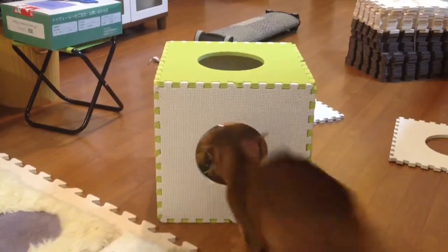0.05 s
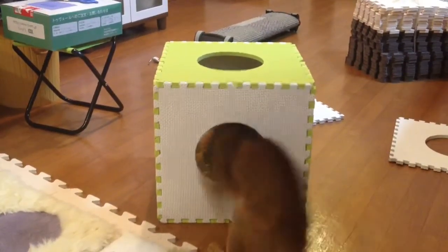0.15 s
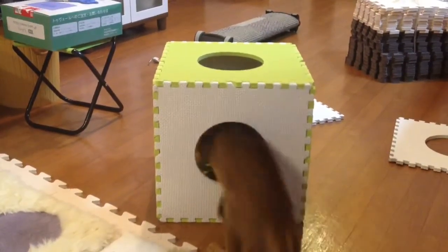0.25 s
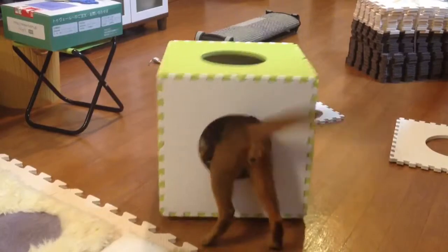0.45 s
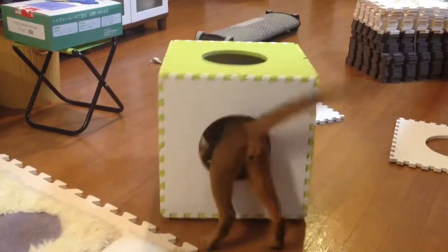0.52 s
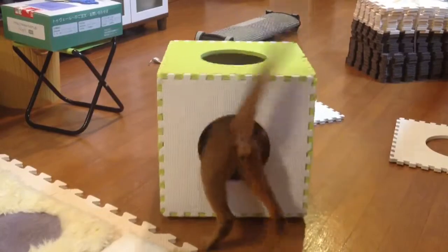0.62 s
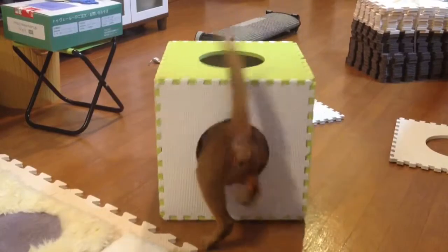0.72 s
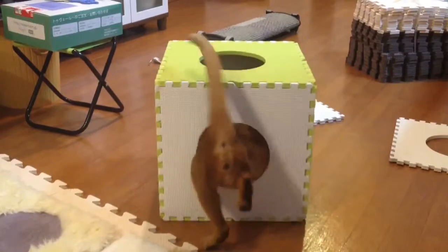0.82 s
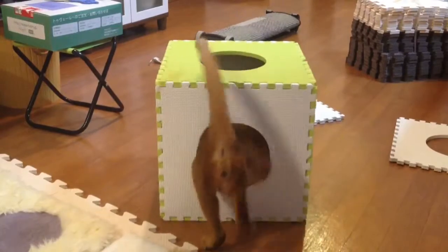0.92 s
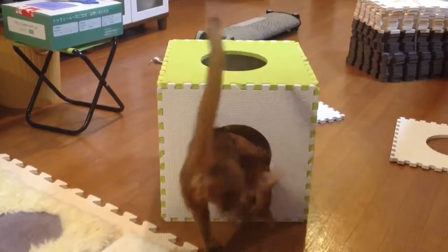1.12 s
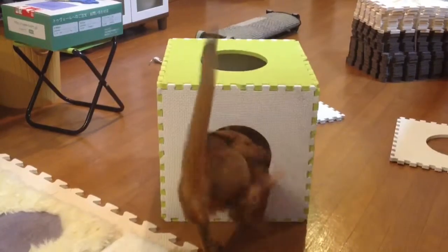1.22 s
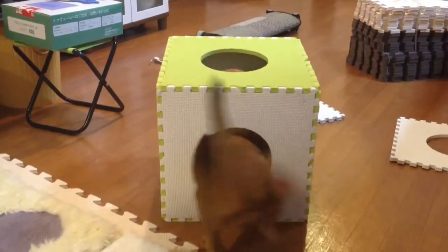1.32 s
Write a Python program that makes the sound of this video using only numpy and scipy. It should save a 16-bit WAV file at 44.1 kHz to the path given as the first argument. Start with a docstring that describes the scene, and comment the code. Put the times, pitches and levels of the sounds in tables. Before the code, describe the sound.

Dull, hollow thumps come in a quick cluster as a scuffling cat dives into a foam cube. Fur brushes and claws tick on the hard floor, then one sharp clack and lighter bumps follow, in a quiet room.

```python
"""Two young cats scuffle at a hollow cube of foam mats on a hard living room floor.
First fur brushes the foam with a soft hiss. Then one cat dives in through the hole: paws and
body thump the cube and make it ring, while claws tick and skid on the floor. At about 0.8 s
a hind foot comes down with one sharp clack. Lighter bumps and rubs end the scuffle.
A short echo and the faint hush of the room lie behind it all."""
import sys
import numpy as np
from scipy import signal
from scipy.fft import rfft, irfft
from scipy.io import wavfile

SR = 44100
rng = np.random.default_rng(int(sys.argv[2]) if len(sys.argv) > 2 else 0)


def transcribe(u):
    """Save the signal u as a 16-bit wav file named by the first command-line argument.

    u: samples, shape (n,) or (channels, n), limited to [-1, 1]; the rate is SR.
    q: integer samples, one column per channel.
    """
    v = np.clip(np.atleast_2d(u).T, -1, 1)
    q = np.round(v * 32767).astype(np.int16)
    wavfile.write(sys.argv[1], SR, q)


N = 59535
TIME = np.arange(N) / SR


def from_db(db):
    """Turn decibels into a number to multiply a sound by."""
    return 10 ** (np.asarray(db) / 20)


def rms_one(x):
    """Scale a sound so that its average strength (rms) is 1."""
    return x / np.sqrt(np.mean(x ** 2) + 1e-20)


def at_hz(points, hz):
    """Read between the rows of a table, with every octave equally wide."""
    pitches, values = np.transpose(points)
    return np.interp(np.log(np.maximum(hz, 1)), np.log(pitches), values)


def filtered(x, hz, kind, order=2):
    """Keep the lows, the highs or a band of a sound, or take a band out."""
    sections = signal.butter(order, np.clip(hz, 10, .45 * SR), kind, fs=SR, output="sos")
    return signal.sosfilt(sections, x + 1e-18)


def coloured(spectrum):
    """Noise of strength 1 whose lows and highs follow a table."""
    gains = from_db(at_hz(spectrum, np.fft.rfftfreq(N, 1 / SR)))
    return rms_one(irfft(rfft(rng.standard_normal(N)) * gains, N))


def click(start_s):
    """The shortest possible tap."""
    return np.maximum(0, 1 - np.abs(TIME - start_s) * SR)


def ring(force, tones):
    """A struck thing rings with several tones; each falls by 60 dB in its fade_s."""
    out = 0
    for pitch_hz, level_db, fade_s in tones:
        decay = from_db(-60 / (fade_s * SR))
        turn = decay * np.cos(2 * np.pi * pitch_hz / SR)
        tone = signal.lfilter([1, -turn], [1, -2 * turn, decay * decay], force + 1e-18)
        out = out + from_db(level_db) * tone
    return out


def thumps(thud_db=1, thud_cycles=15.9, crunch_db=-17, crunch_fade_s=0.041, foam_top_hz=1083):
    """Each blow is a smooth push that thuds, rings the cube and crushes the foam a little."""
    # soft blows of paws and bodies: time_s, level_db, brightness_hz, pitch_hz
    blows = [(0.155, -33.5, 240, 257), (0.1632, -36.5, 330, 292), (0.1705, -30.5, 625, 211),
             (0.1884, -38.5, 1360, 245), (0.2139, -18, 920, 227.4), (0.218, -33.5, 1500, 303),
             (0.2383, -17, 786, 227.6), (0.2474, -23.5, 677, 269), (0.256, -23.5, 506, 224),
             (0.2684, -26, 576, 244.5), (0.2906, -33.5, 740, 466), (0.304, -39.5, 780, 317),
             (0.331, -40, 458, 186), (0.3406, -34, 432, 227), (0.396, -33.5, 680, 327),
             (0.4046, -27, 435, 315), (0.4258, -35.5, 546, 475), (0.4498, -39, 420, 159.6),
             (0.458, -44, 780, 145), (0.5023, -35, 277, 228), (0.6709, -49.5, 290, 213),
             (0.702, -41.5, 433, 241), (0.7246, -44.5, 260, 255), (0.7901, -31, 690, 263),
             (0.827, -41, 396, 306), (0.8524, -33.5, 209, 246), (0.9133, -40, 211, 212),
             (1.0152, -47.5, 970, 326), (1.027, -46, 370, 260), (1.1063, -41.5, 610, 228)]
    # the tones the cube rings with: pitch_hz, level_db, fade_s
    cube_tones = [(180, -30, 0.13), (221, -19.5, 0.17), (278, -15.5, 0.16), (345.7, -7, 0.063),
                  (368.8, -17, 0.21), (497, -21.5, 0.21), (542.6, -14, .24), (585.3, -17.5, 0.22),
                  (677, 2, 0.024), (695, -15.5, 0.17), (754, -21, 0.15), (805, -0.5, 0.034),
                  (889.7, -7.5, .13), (948, -3, 0.079), (1051, -15.5, .2)]
    force, thud, crush = 0, 0, 0
    for time_s, level_db, brightness_hz, pitch_hz in blows:
        pulse = np.exp(-(np.pi * brightness_hz * (TIME - time_s)) ** 2)   # shorter is brighter
        push = from_db(level_db) * pulse / pulse.sum()
        force = force + push
        # the struck spot gives way and swings briefly
        thud = thud + ring(push, [(pitch_hz, thud_db, thud_cycles / pitch_hz)])
        fade = from_db(level_db - 60 * np.abs(TIME - time_s) / crunch_fade_s) * (TIME > time_s)
        crush = crush + fade * (brightness_hz / foam_top_hz) ** 2
    body = filtered(thud + ring(force, cube_tones), 109, "high")   # a small cube gives little bass
    crunch_noise = rms_one(filtered(rng.standard_normal(N), (1090, 1940), "band"))
    muffled = filtered(body, foam_top_hz, "low", order=6)   # foam lets little treble through
    return muffled + from_db(crunch_db) * crush * crunch_noise


def clack(start_s=0.7851, level_db=-24.5, low_hz=480, top_hz=8600, hollow_hz=(4000, 4500)):
    """A hind foot knocks once on the floor boards, with a dip between its crack and its bright top."""
    # the tones of the knock: pitch_hz, level_db, fade_s
    knock_tones = [(715, -10.5, 0.023), (1450, -10.5, 0.0098), (1870, -12, 0.0083), (2430, -7, 0.0068),
                   (2850, -5.5, 0.0027), (3450, -3, 0.0026), (4750, -17, .012), (7400, -6, .003)]
    knock = ring(from_db(level_db) * click(start_s), knock_tones)
    knock = filtered(knock, hollow_hz, "bandstop", order=1)
    knock = filtered(knock, low_hz, "high")
    return filtered(knock, top_hz, "low", order=6)


def claws():
    """Claws tap the hard floor, and each tap rings as a tiny, high tick."""
    # claw taps: start_s, level_db
    taps = [(0.168, -45.5), (0.213, -36), (0.2261, -40), (0.2279, -36), (0.4036, -36.5), (0.4085, -39),
            (0.4239, -33), (0.462, -34), (0.466, -37.5)]
    # the tones of a tick: pitch_hz, level_db, fade_s
    tick_tones = [(2440, -2, 0.0043), (2960, -14, 0.0036), (4720, -12.5, 0.0041), (6870, -3, 0.003),
                  (8100, -16, .004)]
    force = sum(from_db(level_db) * click(start_s) for start_s, level_db in taps)
    return ring(force, tick_tones)


def rattle(hits, level_db=-2, fade_s=0.022):
    """The floor boards shiver for an instant after each hard hit."""
    shiver = rng.standard_normal(N) * from_db(-60 * TIME / fade_s)
    shiver = shiver / np.sqrt(np.sum(shiver ** 2))
    return from_db(level_db) * signal.fftconvolve(hits, shiver)[:N]


def skids(slips_per_s=3500):
    """A skid is many tiny slips that ring around one pitch, swelling and fading."""
    # short skids and rubs: middle_s, length_s, level_db, pitch_hz, width_hz
    slides = [(0.051, 0.01, -55, 8300, 9700), (0.192, 0.0092, -65, 8500, 3000),
              (0.229, 0.011, -49, 8800, 2970), (0.318, .03, -53.5, 8200, 2800),
              (0.483, 0.024, -45, 3305, 920), (0.615, .024, -59, 2590, 1180),
              (1.017, 0.009, -56, 1420, 596), (1.298, 0.029, -54.5, 668, 150)]
    out = 0
    for middle_s, length_s, level_db, pitch_hz, width_hz in slides:
        slips = rng.standard_normal(N) * (rng.random(N) < slips_per_s / SR)
        low_hz = np.sqrt(pitch_hz ** 2 + (width_hz / 2) ** 2) - width_hz / 2
        scrape = rms_one(filtered(slips, [low_hz, low_hz + width_hz], "band"))
        swell = np.exp(-2 * ((TIME - middle_s) / length_s) ** 2)
        out = out + from_db(level_db) * swell * scrape
    return out


def fur(boost_db=0.5, flutter_db=1, flutter_hz=70):
    """Fur brushes the foam with a fine, uneven hiss that follows the cats' movement."""
    # how strongly the fur brushes: time_s, level_db
    brushing = [(0, -67.5), (0.05, -62.5), (0.135, -75), (0.18, -50.5), (0.235, -53.5), (0.27, -58),
                (0.33, -53), (0.375, -63), (0.415, -50.5), (0.47, -53), (0.52, -55), (0.66, -61.5),
                (0.72, -63), (0.8, -55.5), (0.87, -58), (0.98, -53), (1.08, -59.5), (1.12, -55.5),
                (1.2, -61), (1.35, -63)]
    # the lows and highs of the hiss: pitch_hz, level_db
    hiss_colour = [(100, -8), (200, 13.5), (400, 8.5), (900, 9), (1500, 4.5), (3000, -0.5), (5500, -3),
                   (8500, 1), (12000, -2), (15500, -1.5)]
    movement_db = np.interp(TIME, *np.transpose(brushing))
    flutter = rms_one(filtered(rng.standard_normal(N), flutter_hz, "low"))
    return from_db(boost_db + movement_db + flutter_db * flutter) * coloured(hiss_colour)


def room_echo(sound, delay_s=0.003, early_db=1.5, early_fade_s=0.19):
    """Sound bounces around the room: dense early echoes and a tail whose very top dies first."""
    # how long the tail takes to fall by 60 dB: pitch_hz, fade_s
    tail_fades = [(150, 0.34), (600, 0.32), (2500, 0.25), (8000, 0.57), (15000, 0.05)]
    edges_hz = np.geomspace(60, 18000, 9)
    age = np.maximum(TIME - delay_s, 0)
    echo = 0
    for low_hz, high_hz in zip(edges_hz, edges_hz[1:]):
        tail = from_db(-60 * age / at_hz(tail_fades, np.sqrt(low_hz * high_hz)))
        early = from_db(early_db - 60 * age / early_fade_s)
        bounces = filtered(rng.standard_normal(N) * (age > 0), [low_hz, high_hz], "band")
        echo = echo + bounces * (tail + early)
    return signal.fftconvolve(sound, echo / np.sqrt(np.sum(echo ** 2)))[:N]


def room_hush(level_db=-63.5):
    """The faint, steady noise of a quiet room."""
    # the lows and highs of the hush: pitch_hz, level_db
    hush_colour = [(30, -16), (70, -10), (130, -1), (250, 1), (700, -4), (1400, -6), (4000, -11),
                   (15500, -10.5)]
    return from_db(level_db) * coloured(hush_colour)


def scene():
    """Add up the hits and skids, their echo, the fur and the hush of the room."""
    bumps, ticks, knock, rubs = thumps(), claws(), clack(), skids()
    # the hard hits send the largest share of their sound into the echo
    echo = room_echo(from_db(-9.5) * bumps + from_db(-3) * ticks
                     + from_db(-1.5) * knock + from_db(-10.5) * rubs)
    direct = bumps + ticks + knock + rattle(ticks + knock) + rubs
    return (direct + echo + fur() + room_hush())[None]


def record(dry, low_hz=93.5, top_hz=15400):
    """A small microphone picks up little bass, and the highest treble is cut off."""
    thin = filtered(dry, low_hz, "high", order=3)
    treble_cut = signal.ellip(10, .1, 70, top_hz, fs=SR, output="sos")
    return signal.sosfilt(treble_cut, thin)


dry = scene()
out = record(dry)
transcribe(out)
```